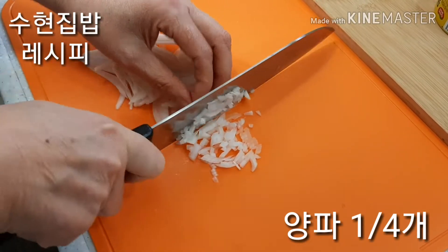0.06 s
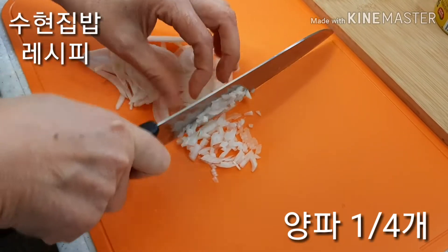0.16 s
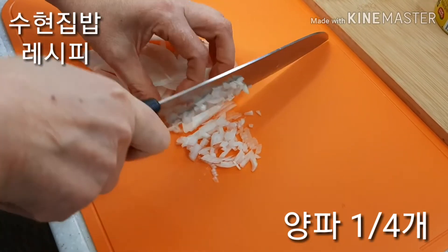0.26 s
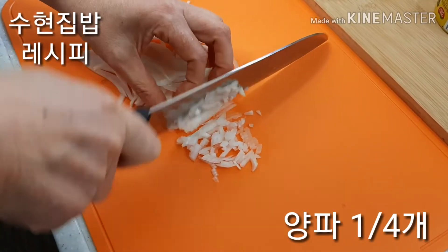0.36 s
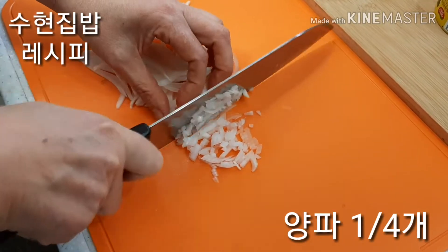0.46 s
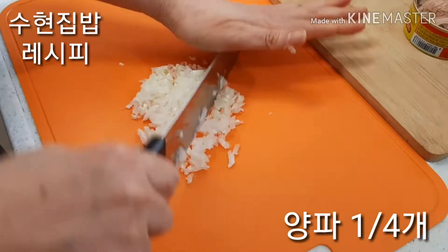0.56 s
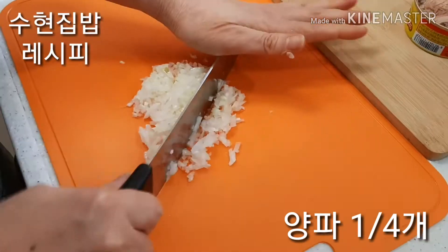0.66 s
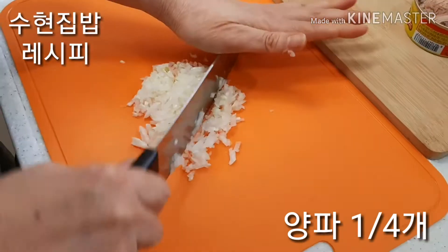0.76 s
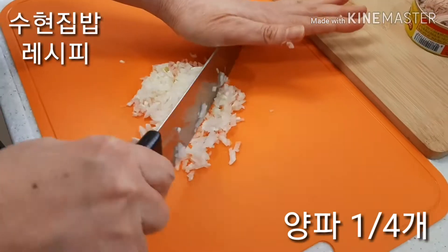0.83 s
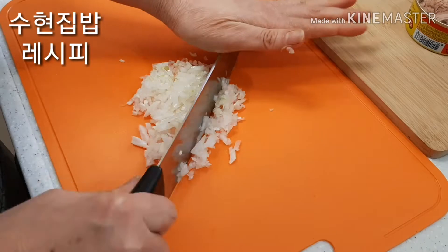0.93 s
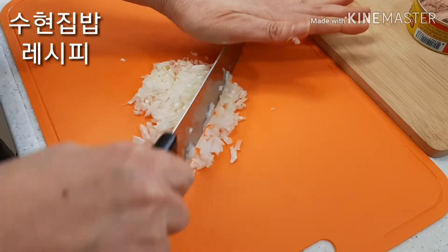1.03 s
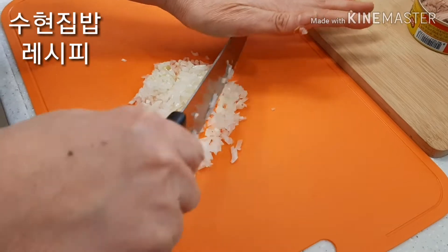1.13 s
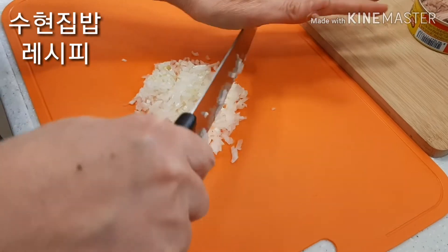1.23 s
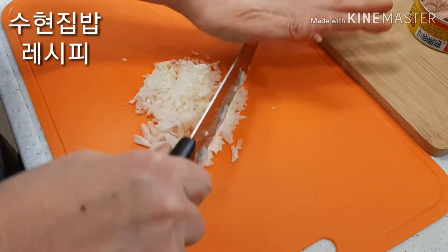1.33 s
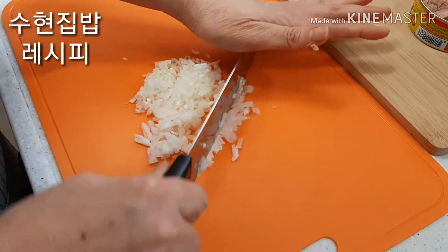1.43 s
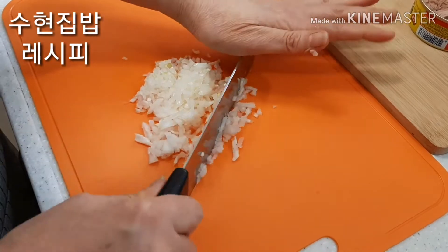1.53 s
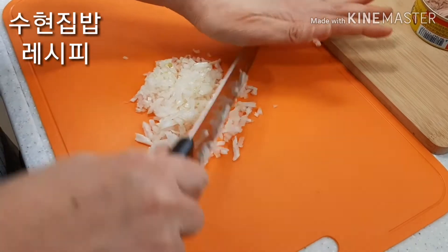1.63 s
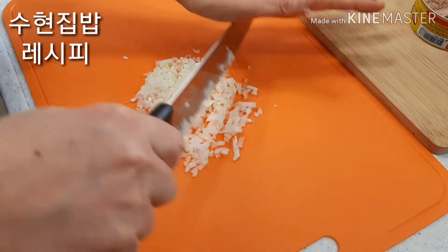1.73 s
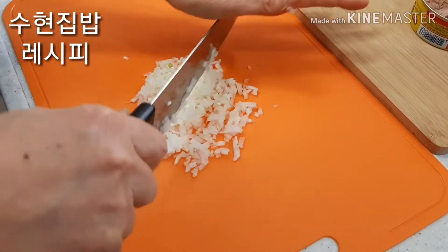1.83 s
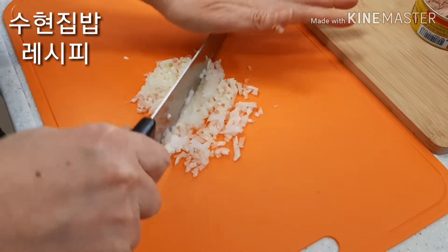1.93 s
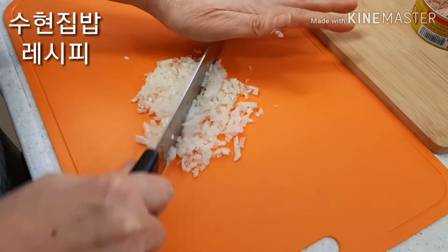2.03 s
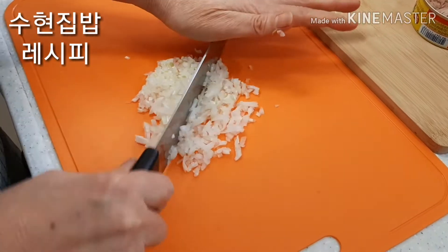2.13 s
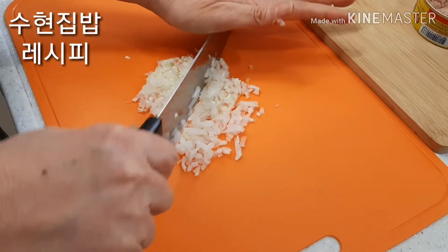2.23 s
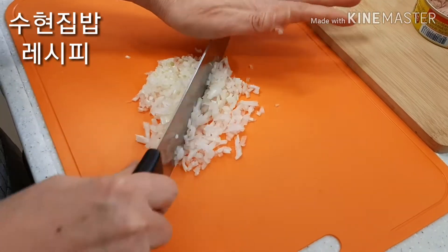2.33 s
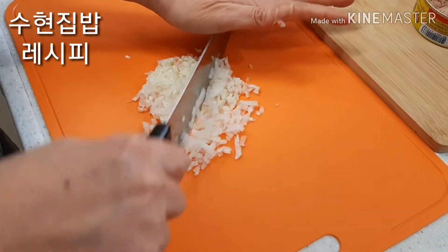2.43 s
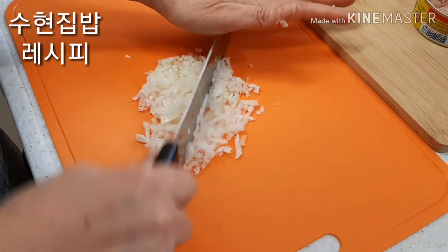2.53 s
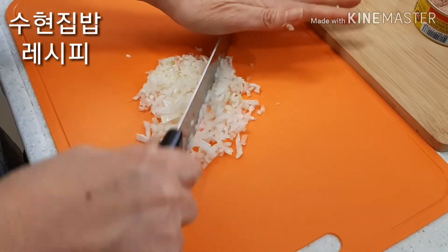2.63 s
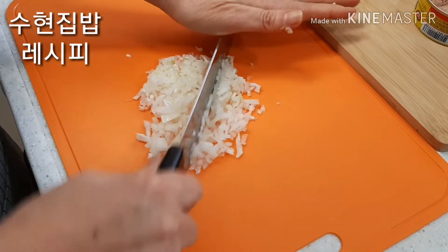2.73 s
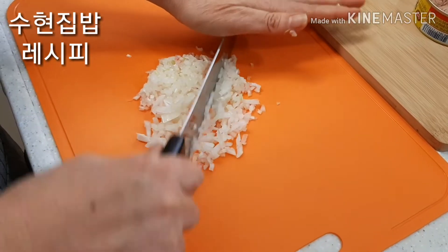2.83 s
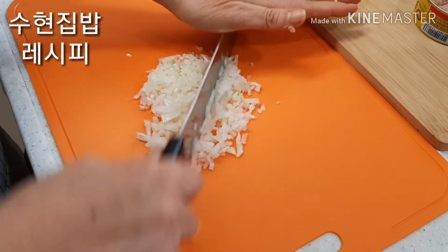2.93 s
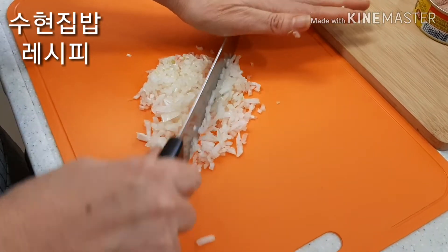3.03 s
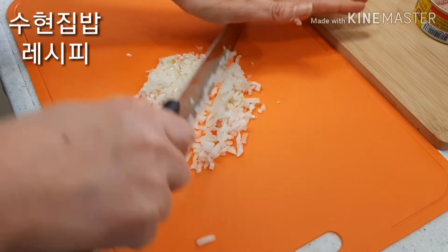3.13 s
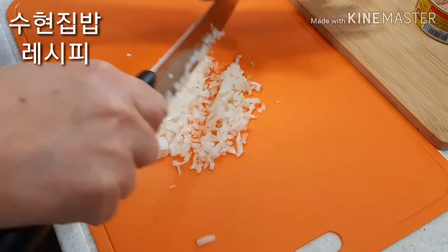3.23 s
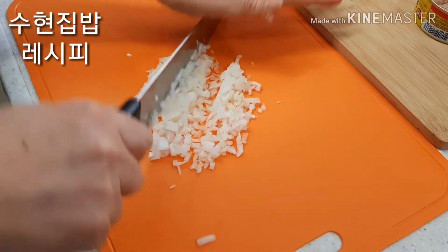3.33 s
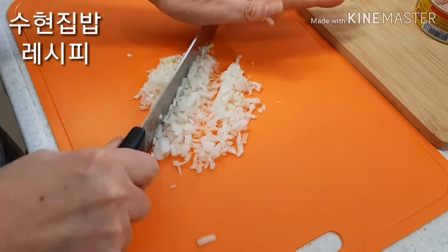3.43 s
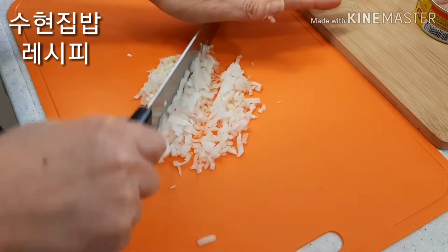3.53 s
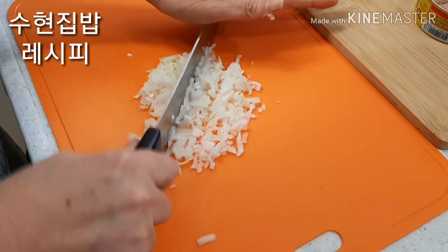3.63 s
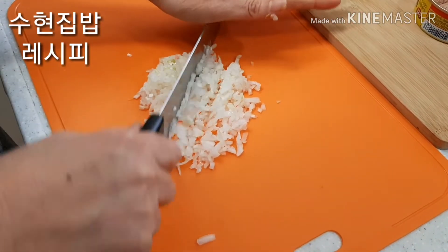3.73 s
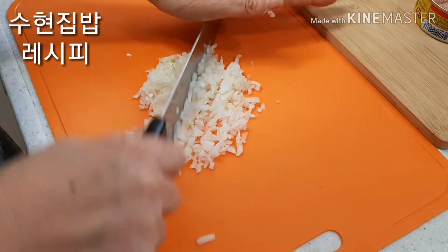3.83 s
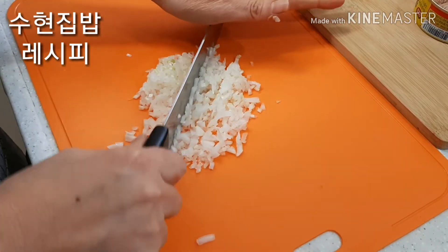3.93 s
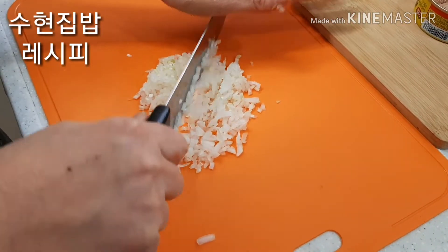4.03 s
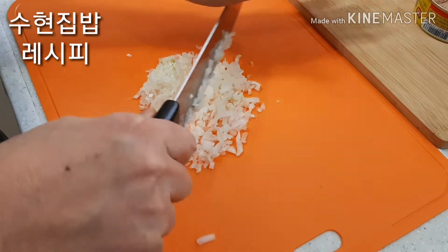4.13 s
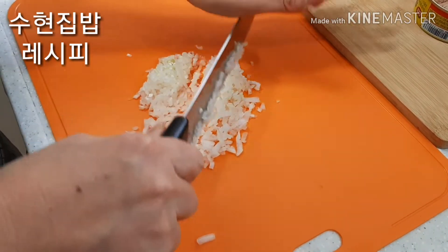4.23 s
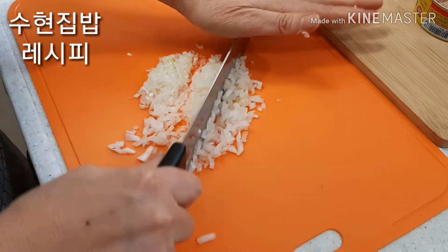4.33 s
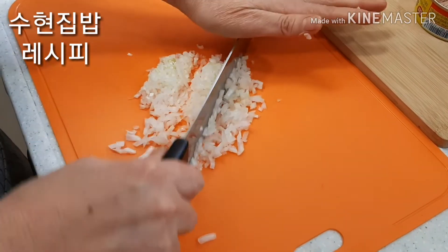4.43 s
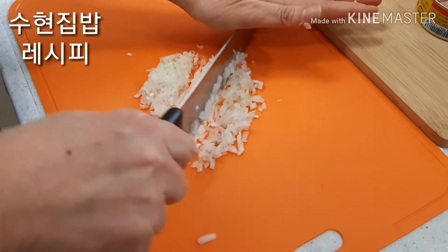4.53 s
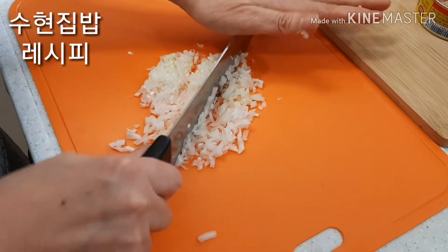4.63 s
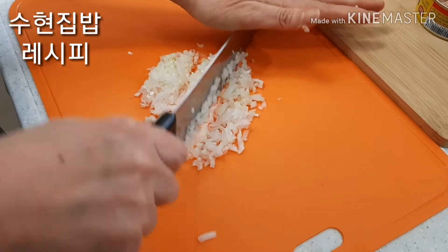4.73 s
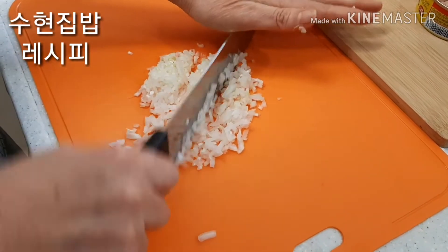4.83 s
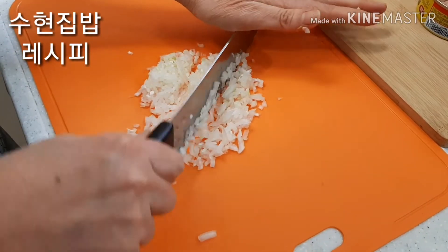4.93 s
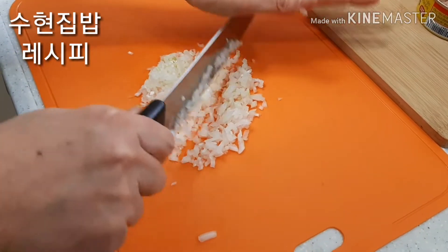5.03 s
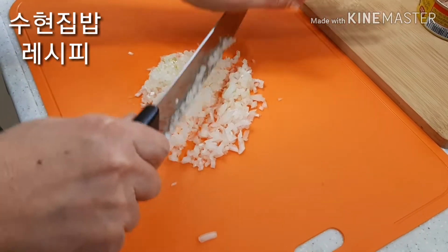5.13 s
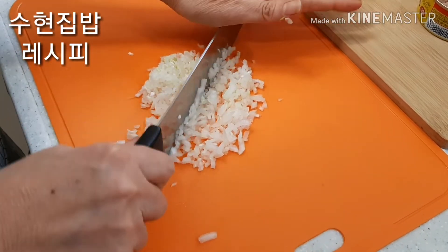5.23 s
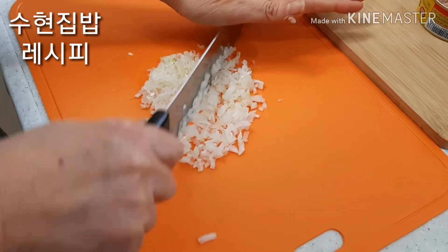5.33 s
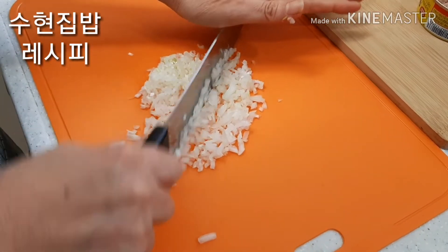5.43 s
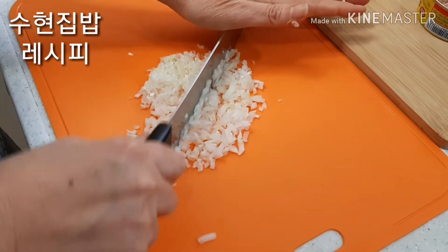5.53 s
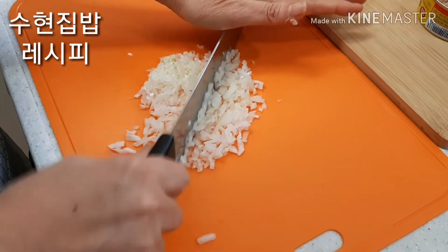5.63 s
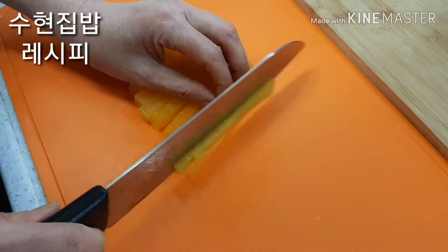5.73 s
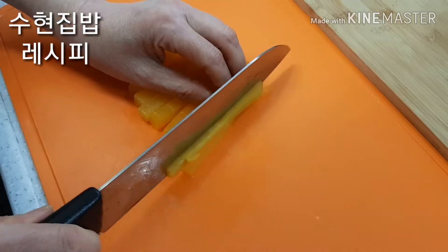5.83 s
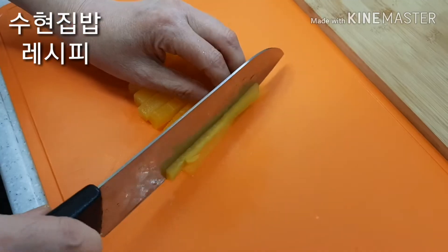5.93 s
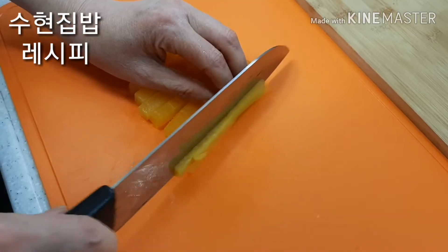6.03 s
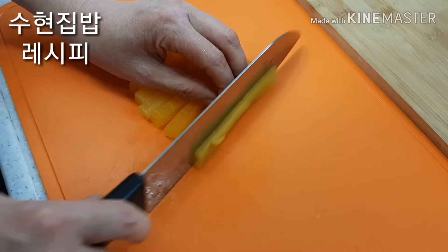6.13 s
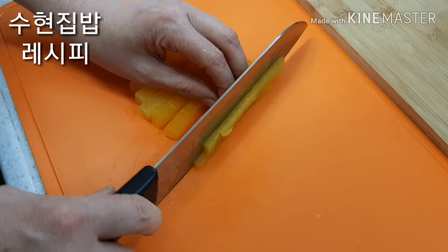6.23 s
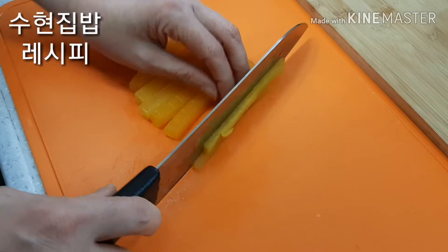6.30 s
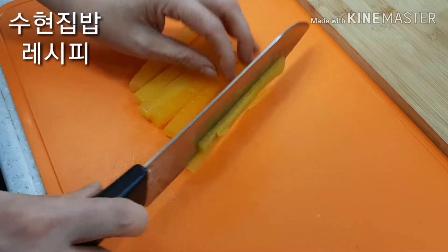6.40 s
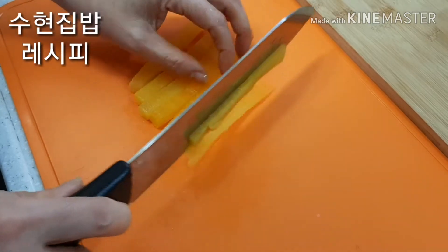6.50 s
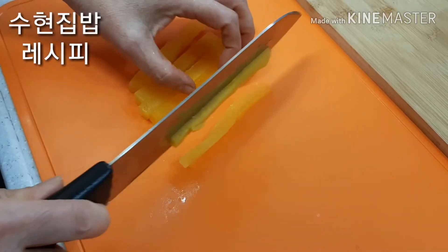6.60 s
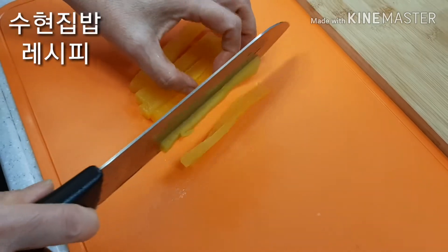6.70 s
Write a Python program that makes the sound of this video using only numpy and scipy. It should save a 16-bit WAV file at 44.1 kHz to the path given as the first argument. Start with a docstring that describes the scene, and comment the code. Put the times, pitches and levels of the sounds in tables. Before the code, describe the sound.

Close, crunchy onion chopping at an uneven pace on a plastic board, with a hard knock, a brief steel clink, and a final duller cut.

```python
"""Knife work on a cutting board

A chef's knife minces onion on a plastic board, then slices a firm vegetable, close to a two-port phone.
Each stroke bursts cells (random clicks) and grinds pieces on the board (noise through its modes).
The edge knocks the board's modes and cracks (band-passed noise); the steel clinks. A small kitchen rings
on over air noise, hum and an early dull rustle. Three shots are cut together."""
import sys
import numpy as np
from scipy import signal
from scipy.fft import rfft, irfft
from scipy.io import wavfile
from scipy.ndimage import uniform_filter1d

SR = 44100
rng = np.random.default_rng(int(sys.argv[2]) if len(sys.argv) > 2 else 0)


def wrap_up_sound(samples):
    """Save the sound to the file named by the first command line argument, as 16-bit audio."""
    columns = np.atleast_2d(samples).T
    # keep every value between -1 and 1, then stretch to whole-number steps
    tamed = np.clip(columns, -1, 1)
    steps = np.round(tamed * 32767).astype(np.int16)
    wavfile.write(sys.argv[1], SR, steps)


N = 298071

# Source levels are relative: direct gain, port balance and the phone's filters follow them.
# Edge goes down through the pieces: (enters [s], rise [s], fall [s], crackle level [dB],
# finest crackle above it [dB], grind above it [dB])
CUTS = [(0.033, 0.03, 0.033, -42, 2.5, 4.5), (.46, 0.035, 0.028, -42, 5.5, 3.5),
        (0.723, 0.018, 0.053, -45.5, 4.5, 6.5), (.945, 0.054, 0.028, -47, 2, 0.5),
        (1.469, 0.11, 0.032, -47.5, 2, -1), (1.962, 0.062, 0.013, -54.5, -2.5, 2),
        (2.091, .021, 0.1, -45.5, 5, -2.5), (2.361, 0.033, 0.045, -42.5, 4, 1.5),
        (2.586, 0.052, .022, -47, 4, -2), (2.794, 0.017, .025, -43.5, 4.5, -6),
        (2.815, 0.02, .025, -42.5, 4, 0.5), (3.022, 0.04, 0.034, -45, -0.5, 1),
        (3.408, 0.0049, 0.014, -35.5, -8.5, -22), (3.433, 0.034, 0.078, -39.5, 0.5, 5.5),
        (3.689, 0.036, 0.037, -43.5, 4.5, -2), (3.893, 0.04, 0.067, -45.5, 2.5, 0.5),
        (4.368, 0.0099, 0.054, -45.5, -0.5, 5), (4.404, 0.034, 0.049, -46, 3.5, 2.5),
        (4.653, 0.038, 0.041, -45.5, 4.5, 2), (4.904, .029, 0.018, -46, 2.5, 5),
        (5.226, 0.058, 0.097, -49.5, 3.5, -3), (5.493, .025, 0.067, -47.5, 6, 2.5),
        (5.698, .047, 0.019, -46.5, 1, -1), (6.094, 0.032, 0.072, -55.5, 2.5, 7.5),
        (6.15, 0.025, 0.12, -55, 6, 11)]
# Blade pulls free, pieces slide along it: (middle [s], half length [s], crackle level [dB],
# finest crackle above it [dB])
LIFTS = [(0.142, 0.052, -64.5, -3), (0.59, 0.11, -71.5, -18), (0.829, 0.024, -65, 2),
         (1.061, 0.032, -58, -5), (1.672, 0.036, -57, 1), (2.087, 0.09, -61.5, 3.5),
         (2.164, 0.045, -74, -12), (2.233, 0.012, -57.5, 5), (2.461, 0.016, -55, 1.5),
         (2.686, 0.022, -52, -2), (3.112, 0.043, -65.5, -1), (3.552, 0.038, -57.5, 0),
         (3.806, 0.1, -68, -10), (4.011, 0.044, -61, 3), (4.362, 0.011, -72.5, 9.5),
         (4.507, 0.032, -64, 4.5), (4.765, 0.059, -64.5, -10), (4.962, .03, -69, -8),
         (5.349, 0.024, -63, 13), (5.582, 0.029, -58.5, 0.5), (5.805, 0.023, -66, -4),
         (6.357, 0.0068, -78, 13), (6.382, 0.016, -64.5, 3), (6.644, .03, -93.5, 11)]
# Spectrum of the coarse crackle: (frequency [Hz], relative density [dB per Hz])
COARSE_COLOUR = [(500, -13.5), (1200, -11), (1900, -8.5), (2700, -6.5), (4500, -3), (6800, -5), (7800, -2),
                 (8600, -10.5), (9500, -41.5)]
# Spectrum of the finest crackle: (frequency [Hz], relative density [dB per Hz])
FINE_COLOUR = [(7000, -14.5), (8400, 0), (11000, 5.5), (14500, -0.5), (15400, 1), (16000, -35)]
# Edge meets board, before the strike delay: (time [s], board peak [dB], hardness [0-1],
# crack peak [dB], crack centre [Hz])
KNOCKS = [(0.037, -43, 0.78, -35.5, 7700), (0.088, -41, 0.54, -59.5, 3290), (0.484, -41, 0.5, -54, 9410),
          (0.491, -34.5, 0.45, -37, 7580), (0.51, -37.5, 0.75, -48, 3280), (0.761, -33.5, 0.18, -54, 3280),
          (0.782, -46, 0.34, -62, 3000), (0.811, -57, 0.5, -60, 3000), (0.974, -67, 0.7, -48, 12900),
          (1.002, -35, 1, -48, 11400), (1.363, -55, 0.67, -66, 4000), (1.462, -41.5, 0.36, -36.5, 4630),
          (1.533, -55, 0.9, -32, 13800), (1.556, -44, 0.3, -34, 11200), (2.002, -38.5, 0.31, -34.5, 4960),
          (2.103, -68, 0.5, -50, 8000), (2.22, -66, 0.7, -37, 10000), (2.403, -34, 0.14, -43, 11900),
          (2.807, -55, 0.64, -40, 11800), (2.829, -44, 0.5, -54.5, 11000), (2.8601, -44, 0, -16.5, 4760),
          (3.058, -45, 0.59, -47, 7940), (3.061, -40, 0.1, -42.5, 7800), (3.4095, -13, 0.77, -29.5, 2590),
          (3.419, -15.5, 0.88, -17, 2460), (3.72, -40.5, 0.58, -24, 7670), (3.947, -37, 0.45, -48, 12900),
          (4.002, -52, 0.25, -48.5, 10320), (4.374, -52, 0.35, -40, 5000),
          (4.383, -30.5, 0.21, -36.5, 4200), (4.454, -35.5, 0.56, -47, 3710),
          (4.696, -41.5, 0.64, -32, 10700), (4.921, -42.5, 0.25, -55.5, 11400),
          (4.938, -41.5, 0.14, -41.5, 2730), (5.25, -41.5, 0.36, -53.5, 3940),
          (5.278, -49.5, 0.5, -28.5, 4500), (5.461, -49, 0.57, -74, 7460), (5.918, -78, 0.1, -58, 7550),
          (6.172, -35.5, 0.25, -54, 9380), (6.2003, -26.5, 0.49, -31, 3080), (6.219, -36, 0.43, -54, 2870),
          (6.352, -70, 0.85, -67, 9900), (6.38, -53, 0.47, -68, 5860)]
# Vibration modes of the board: (frequency [Hz], relative level [dB], 60 dB decay time [s])
BOARD_MODES = [(133, -9, 0.083), (187.6, -7, 0.11), (272.6, -4.5, 0.04), (345.4, -1, 0.048),
               (478, 1.5, 0.036), (553, -1, 0.026), (687.4, -4, 0.052), (781, -0.5, 0.033),
               (1020, 2.5, 0.014), (1200, -5.5, 0.035), (1454, 1, 0.012), (1670, -15, 0.017),
               (1830, 0, 0.017), (2480, -31.5, 0.02), (3100, 8, 0.011)]
# The steel itself is set ringing, before the strike delay: (time [s], peak level [dB])
CLINKS = [(1.063, -45), (2.86, -20), (3.0843, -34.5)]
# Vibration modes of the blade: (frequency [Hz], relative level [dB], 60 dB decay time [s])
BLADE_MODES = [(1319, -8, .02), (1560, -7, .012), (1696, -4, .028), (1770, -6, .02), (1850, -8, .015),
               (2800, -6, .004), (4300, -4, .003), (5900, -4, .003), (8000, -6, .006), (10400, -5, .008)]
# Shots cut together: (ends [s], left lags right [samples], left minus right [dB])
SHOTS = [(.88, 5, -1.5), (5.95, -4, -3), (6.8, 6, -1)]
# Reverberation time of the kitchen: (frequency [Hz], 60 dB decay time [s])
ROOM_T60 = [(100, 0.36), (500, 0.51), (2000, 0.44), (6000, 0.27), (15000, 0.2)]
# Likeness of diffuse sound at both ports: (frequency [Hz], correlation [0-1])
LIKENESS = [(60, 0.47), (250, 0.93), (600, 0.17), (1500, 0.078), (16000, 0.033)]
# Spectrum of air and microphone hiss: (frequency [Hz], relative density [dB per Hz])
AIR_COLOUR = [(15, -47.5), (25, 1.5), (59, -3), (175, -7), (575, -21), (863, -20.5), (1740, -30),
              (1890, -38.5), (2840, -35), (3920, -42.5), (4370, -39.5), (11300, -38), (16000, -41)]
# Air and hiss in each shot: (level [dB rms])
AIR_DB = [-61.5, -65.5, -66.5]
# Appliance motor tones before their waver: (frequency [Hz], level [dB rms])
HUM = [(82, -69.5), (246, -77.5)]
# Dull rustle, gone within the first second: (time [s], level [dB])
RUSTLE = [(0, -53), (.2, -55), (.45, -59.5), (.6, -62.5), (.8, -51.5), (.82, -57), (.87, -92), (.95, -100),
          (6.8, -100)]
# Spectrum of the rustle: (frequency [Hz], relative density [dB per Hz])
RUSTLE_COLOUR = [(59, -49.5), (100, -16.5), (139, -6.5), (336, -4), (522, -10.5), (615, -8.5),
                 (1730, -15.5), (5000, -40.5), (6500, -50.5), (11000, -120)]

ENTRY_DB, ENTRY_POWER = -27.5, 1.48  # change at the edge's entry, curve of the rise
FALL_DB, FALL_POWER = -26, 1.56  # change after one fall time, curve of the fall
FINE_EARLY_DB, FINE_LATE_DB = 3.5, -11.5  # a cut starts bright and ends dull
GRIND_EARLY_DB, GRIND_LATE_DB = 7, 9  # the grind starts fuller and lasts longer
GRIND_LAG_S = 0.0025  # and peaks later
LIFT_END_DB, LIFT_GRIND_DB = -28.5, 2  # change at a lift's half length, grind above crackle
STRIKE_DELAY_S = .002  # knocks and clinks start this long after their listed times
DIRECT_DB, ROOM_DB = 2.0, -4.5  # gains of the direct sound and of the diffuse tail
LOW_HZ, TOP_HZ = 90., 16300  # limits of the phone's passband
RING, FRAME = SR // 5, 256  # length of struck responses, short-time transform frame [samples]


def strokes(lag):
    """Fracture and friction: sheared cells crackle while crushed pieces grind on the board."""
    coarse_gain, fine_gain, grind_gain = effort()
    coarse = along_blade(5000., 1.9, lag, 8.7)
    fine = along_blade(9000., 1.4, lag, 1.5)
    crackle = patchy(colour(coarse, COARSE_COLOUR), 2.8, 0.015)
    finest = patchy(colour(fine + 2.7 * coarse, FINE_COLOUR), 4.2, 0.011)

    soft_push = np.hanning(int(0.0011 * SR))  # soft pieces push slowly
    body = np.convolve(ring(BOARD_MODES, np.zeros(len(BOARD_MODES))), soft_push)
    body = body / np.linalg.norm(body)
    rub = colour(rng.standard_normal((2, N)), [(200, -35), (600, -2.5), (2000, -2.5)])
    push = unit(bursts(2000., 1.0)) + undb(-4.0) * rub
    grind = signal.fftconvolve(grind_gain * undb(-6.5) * push, body[None], axes=1)[:, :N]
    return coarse_gain * crackle + fine_gain * finest + grind


def effort():
    """Amplitude envelopes of crackle, finest crackle and grind: cuts rise and fall, lifts swell."""
    t, gains = np.arange(N) / SR, np.zeros((3, N))
    for s, rise, fall, db, fine_db, grind_db in CUTS:
        near = slice(int(s * SR), int((s + rise + 4 * fall) * SR))
        late = t[near] - s - rise - np.array([[0], [0], [GRIND_LAG_S]])
        ahead = np.clip(-late / rise, 0, None)  # rise times before the peak
        past = np.clip(late / fall, 0, None)  # fall times after it
        shape_db = ENTRY_DB * ahead ** ENTRY_POWER + FALL_DB * past ** FALL_POWER
        shape_db[1] += fine_db + FINE_EARLY_DB * ahead[1] + FINE_LATE_DB * past[1]
        shape_db[2] += grind_db + GRIND_EARLY_DB * ahead[2] + GRIND_LATE_DB * past[2]
        fade_in = np.clip((t[near] - s) / .003, 0, 1)
        gains[:, near] += undb(db + shape_db) * fade_in
    for s, half, db, fine_db in LIFTS:
        near = slice(int((s - 2 * half) * SR), int((s + 2 * half) * SR))
        layer_db = db + np.array([[0], [fine_db], [LIFT_GRIND_DB]])
        swell_db = LIFT_END_DB * ((t[near] - s) / half) ** 2
        gains[:, near] += undb(layer_db + swell_db)
    return gains


def along_blade(per_s, scatter_db, lag, own_db):
    """Extended source: some bursts reach both ports with a lag, others differ from port to port."""
    shared = bursts(per_s, scatter_db)
    own = np.array([bursts(per_s, scatter_db), bursts(per_s, scatter_db)])
    return unit(ports(shared, lag) + undb(own_db) * own)


def bursts(per_s, scatter_db):
    """Shot noise: random clicks of bursting cells, louder in bunches as the edge meets layer after layer."""
    hit = rng.random(N) < per_s / SR
    layers = unit(uniform_filter1d(rng.standard_normal(N), int(0.0065 * SR)))
    cell_size = np.minimum(rng.exponential(size=N), 4.)
    size_db = scatter_db * (cell_size + 1.6 * np.clip(layers, -3, 2.2))
    return hit * rng.standard_normal(N) * undb(size_db)


def patchy(x, spread_db, hold_s):
    """Time-varying filtering: the level of each band wanders from moment to moment; rms 1."""
    hz, t, z = signal.stft(x, SR, nperseg=FRAME)
    drift = uniform_filter1d(rng.standard_normal(z.shape[1:]), size=7, axis=0)
    hold_frames = max(int(hold_s * SR * 2 / FRAME), 1)
    drift = unit(uniform_filter1d(drift, hold_frames, axis=1))
    return unit(signal.istft(z * undb(spread_db * drift), SR, nperseg=FRAME)[1][:, :N])


def knocks(lag):
    """Impact excitation: a push, shorter when harder, rings the board's modes, and the edge cracks."""
    board_out, crack_out = np.zeros((2, N + SR)), np.zeros(N + SR)
    shape = (len(KNOCKS), len(BOARD_MODES))
    spot_db = 2.5 * rng.standard_normal(shape)  # every spot excites the modes differently
    # a wide board sends its higher modes unequally to the two ports
    width = np.clip(np.transpose(BOARD_MODES)[0] / 870.0, 0, 1) ** 2
    lobes_db = 9.4 * rng.standard_normal(shape) * width
    t = np.arange(RING) / SR
    for (s, db, hard, crack_db, crack_hz), spot, lobe in zip(KNOCKS, spot_db, lobes_db):
        push_s = 0.006 * 0.061 ** np.clip(hard, 0, 1.2)
        push = np.hanning(int(push_s * SR) + 3)
        modes = [ring(BOARD_MODES, spot + lobe), ring(BOARD_MODES, spot - lobe)]
        board = signal.fftconvolve(modes, push[None], axes=1)[:, :RING]
        band = [crack_hz / 1.8, min(crack_hz * 1.8, .45 * SR)]
        edge = signal.butter(2, band, "band", fs=SR)
        crack = signal.lfilter(*edge, rng.standard_normal(RING) * np.exp(-t / .0013))
        i = int((s + STRIKE_DELAY_S) * SR)
        board_out[:, i:i + RING] += undb(db) * board / np.abs(board).max()
        crack_out[i:i + RING] += undb(crack_db) * crack / np.abs(crack).max()
    return board_out[:, :N] + ports(crack_out[:N], lag)


def clinks():
    """Modal ringing of the blade, struck by a brief decaying rattle."""
    out, blade = np.zeros(N + SR), ring(BLADE_MODES, np.zeros(len(BLADE_MODES)))
    for s, db in CLINKS:
        rattle = rng.standard_normal(RING) * np.exp(-np.arange(RING) / (.0004 * SR))
        chatter = signal.fftconvolve(blade, rattle)[:RING]
        i = int((s + STRIKE_DELAY_S) * SR)
        out[i:i + RING] += undb(db) * chatter / np.abs(chatter).max()
    return out[:N]


def ring(modes, gains_db):
    """Modal superposition: decaying sines form an impulse response; neighbours swing in opposite sense."""
    hz, db, t60 = np.transpose(modes)[:, :, None]
    t = np.arange(RING) / SR
    sign = (-1.) ** np.arange(len(modes))[:, None]
    amplitude = sign * undb(db + gains_db[:, None])
    decay = 1000. ** (-t / t60)
    return np.sum(amplitude * np.sin(2 * np.pi * hz * t) * decay, axis=0)


def ports(x, lag):
    """Arrival-time difference: the left port hears x a few samples late or early."""
    return np.array([x[np.clip(np.arange(N) - lag, 0, N - 1)], x])


def room(x):
    """Reverberation: the kitchen's diffuse tail at both ports, dying at its own rate in each band."""
    n = int(.7 * SR)
    hz, t, z = signal.stft(diffuse(n), SR, nperseg=FRAME)
    decay = 1000. ** (-t / on_log(ROOM_T60, FRAME)[:, None])
    tail = signal.istft(z * decay, SR, nperseg=FRAME)[1][:, :n]
    tail = tail * np.clip(np.arange(n) / (0.00067 * SR), 0, 1)  # short onset
    tail = tail / np.linalg.norm(tail[0])
    return undb(ROOM_DB) * signal.fftconvolve(x[None], tail, axes=1)[:, :N]


def kitchen(shot):
    """Stationary noise and tones: wavering air and microphone hiss, wavering motor hum, and the rustle."""
    t = np.arange(N) / SR
    air = undb(AIR_DB)[shot] * patchy(colour(diffuse(N), AIR_COLOUR), 1.9, 0.21)
    waver = 1 + .25 * unit(uniform_filter1d(rng.standard_normal(N), SR // 12))
    hum = waver * sum(np.sqrt(2) * undb(db) * np.sin(2 * np.pi * hz * t) for hz, db in HUM)
    rustle_gain = undb(np.interp(t, *np.transpose(RUSTLE)))
    rustle = rustle_gain * colour(diffuse(N), RUSTLE_COLOUR)
    return air + hum + rustle


def diffuse(n):
    """Diffuse-field correlation: noise at two ports, more alike in the bass than in the treble."""
    c = np.clip(on_log(LIKENESS, n), 0, 1)
    mid, side = rfft(rng.standard_normal((2, n))) * np.sqrt([1 + c, 1 - c])
    return irfft([mid + side, mid - side], n) / 2


def colour(x, spectrum):
    """Linear filtering: shape x by (frequency [Hz], level [dB]) points; rms 1."""
    n = x.shape[-1]
    return unit(irfft(rfft(x) * undb(on_log(spectrum, n)), n))


def on_log(table, n):
    """Logarithmic frequency scale: read a (frequency [Hz], value) table at an n-point transform's bins."""
    hz, value = np.transpose(table)
    return np.interp(np.log(np.fft.rfftfreq(n, 1 / SR) + 1), np.log(hz), value)


def undb(db):
    """Level to amplitude ratio."""
    return 10 ** (np.asarray(db) / 20)


def unit(x):
    """Normalization to an rms amplitude of 1."""
    return x / np.sqrt(np.mean(x ** 2))


def scene():
    """Superposition: direct knife sound and reverberation, balanced between ports, over the background."""
    end_s, lag, pan_db = np.transpose(SHOTS)
    shot = np.searchsorted(end_s, np.arange(N) / SR)
    lag = lag[shot].astype(int)
    balance = undb(np.array([pan_db[shot], -pan_db[shot]]) / 2)
    knife = strokes(lag) + knocks(lag) + ports(clinks(), lag)
    return balance * (undb(DIRECT_DB) * knife + room(knife[1])) + kitchen(shot)


def record(dry):
    """Band limitation: the phone thins the deep bass and cuts the top steeply."""
    thin = signal.sosfilt(signal.butter(2, LOW_HZ, "high", fs=SR, output="sos"), dry)
    return signal.sosfilt(signal.ellip(10, .2, 70, TOP_HZ, fs=SR, output="sos"), thin)


dry = scene()
out = record(dry)
wrap_up_sound(out)
```